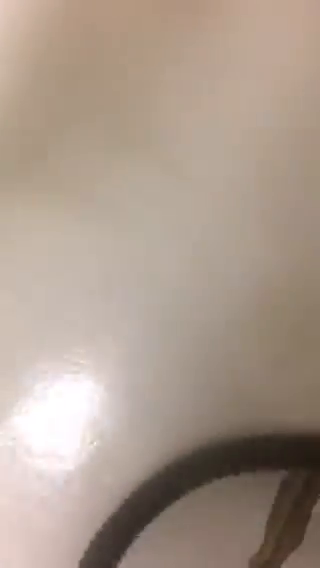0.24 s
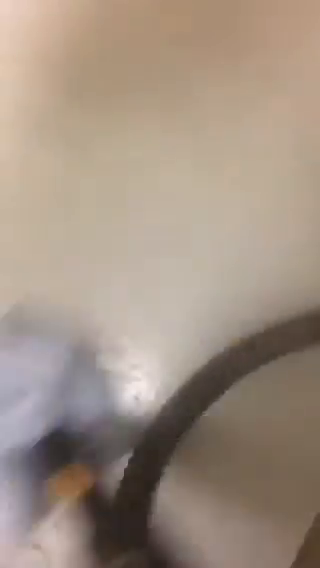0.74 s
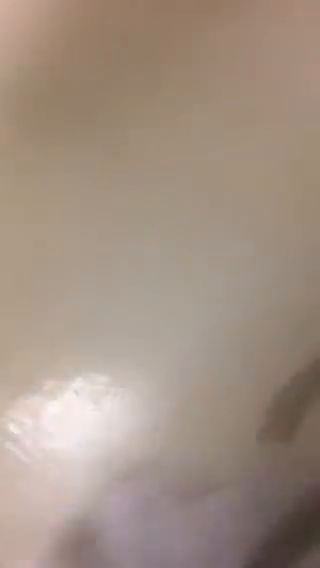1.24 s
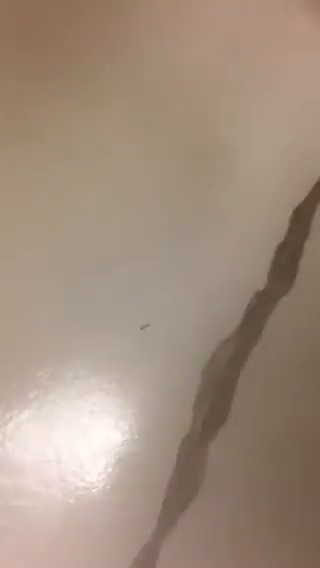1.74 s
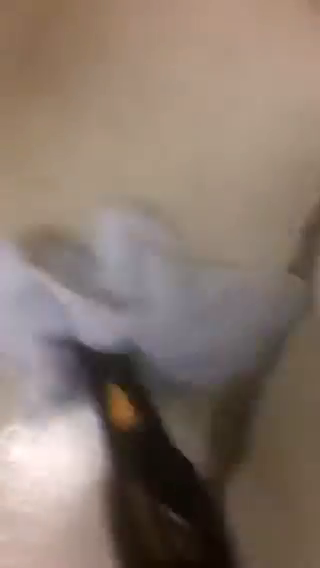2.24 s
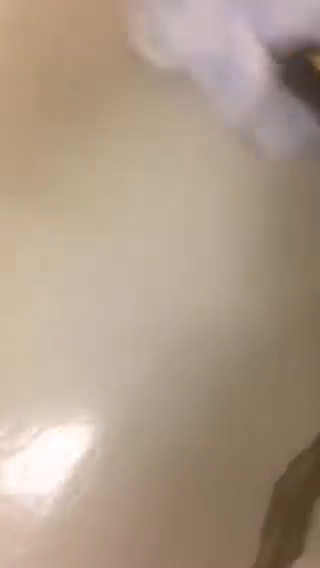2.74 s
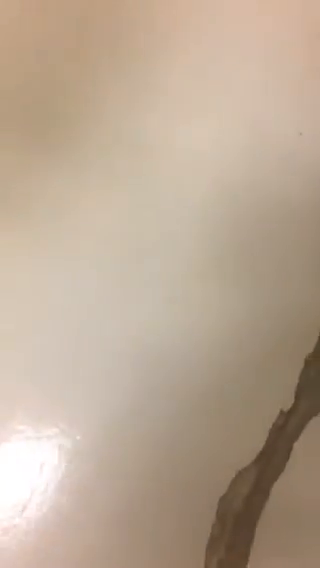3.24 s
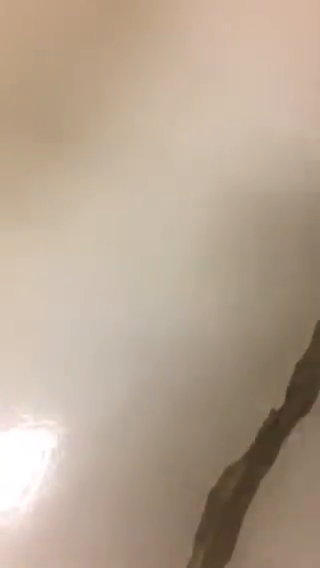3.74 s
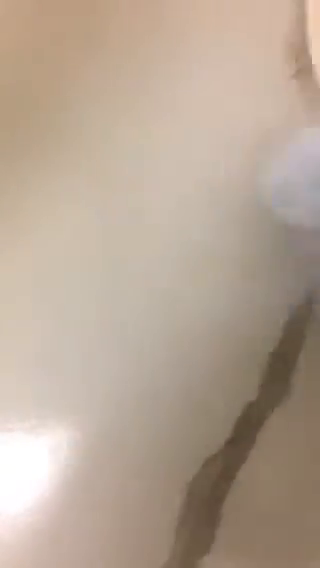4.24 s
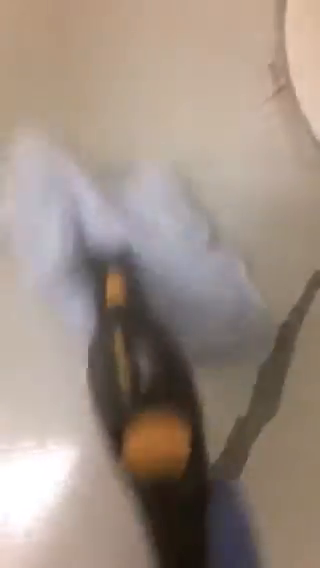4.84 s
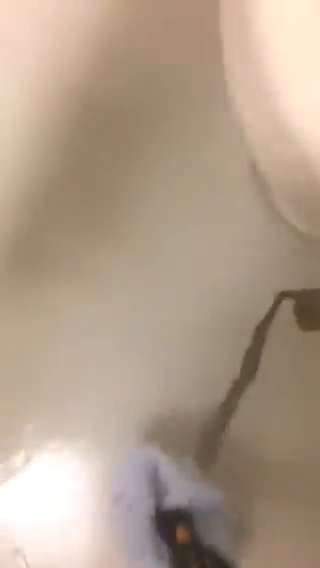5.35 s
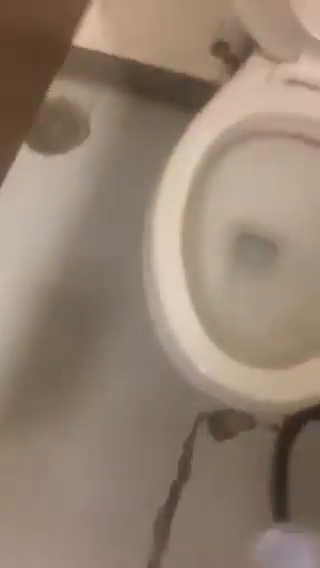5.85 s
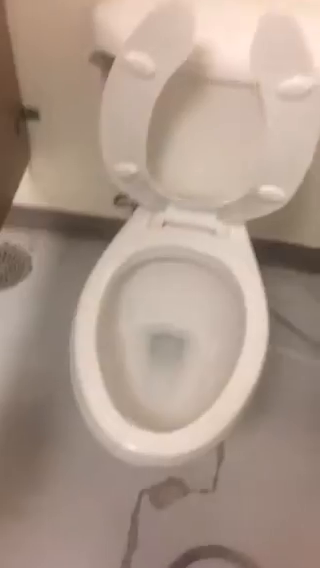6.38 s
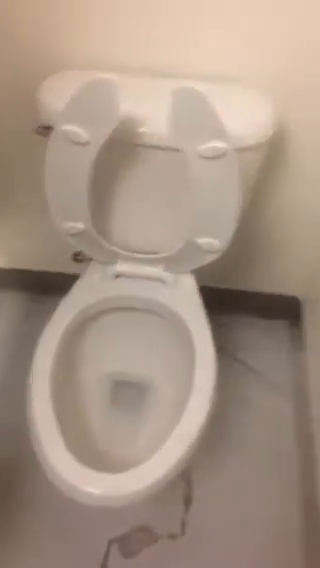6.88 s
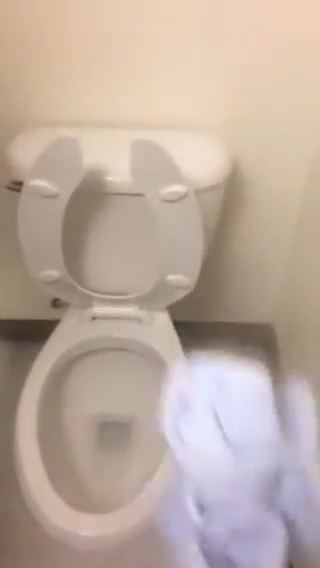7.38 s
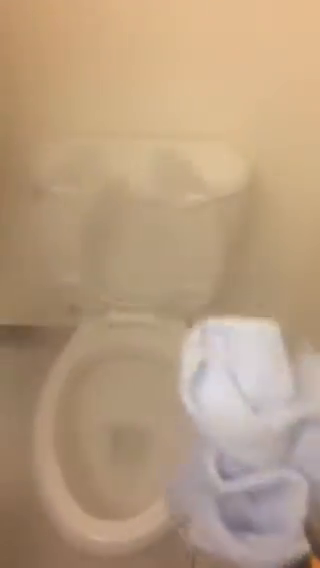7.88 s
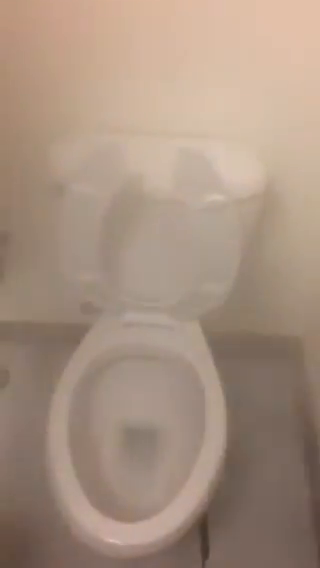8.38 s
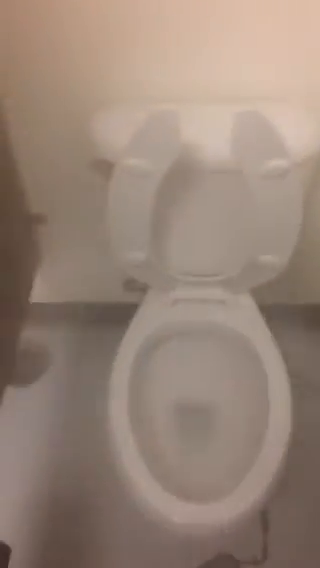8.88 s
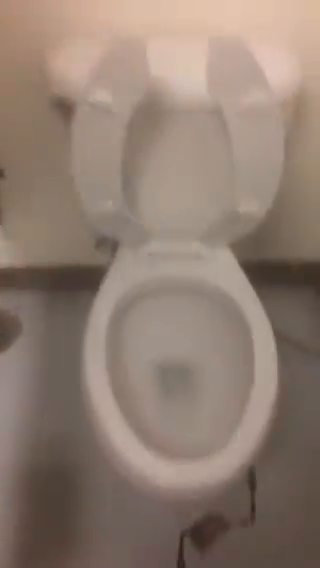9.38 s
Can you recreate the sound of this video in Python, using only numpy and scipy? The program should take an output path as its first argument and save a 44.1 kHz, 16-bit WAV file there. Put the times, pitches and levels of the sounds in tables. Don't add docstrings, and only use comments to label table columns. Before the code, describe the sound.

Rushing steam with a shifting, breathy tone fills a small echoing restroom until a sharp valve clack stops it, leaving quiet hum and tiny ticks.

```python
import sys
import numpy as np
from scipy import signal
from scipy.io import wavfile
from scipy.ndimage import uniform_filter1d, minimum_filter1d

SR = 44100
rng = np.random.default_rng(int(sys.argv[2]) if len(sys.argv) > 2 else 0)


def wrap_up_sound(samples):
    columns = np.atleast_2d(samples).T
    tamed = np.clip(columns, -1, 1)
    steps = np.round(tamed * 32767).astype(np.int16)
    wavfile.write(sys.argv[1], SR, steps)


def natural_amplitude(level_db):
    exponent = np.asarray(level_db, float) / 20
    return 10 ** exponent


N = 424241
STEP = 32
SHUT_S = 7.777
# pitch_hz, t60_s (time to fall 60 dB)
WALLS = [(60, 0.1), (300, 0.38), (800, 0.7), (4000, 0.84), (8000, 0.63), (14000, 0.19)]


def rms_one(x):
    return x / np.sqrt(np.mean(x ** 2) + 1e-20)


def at_hz(points, hz):
    pitch_hz, value = np.transpose(points)
    return np.interp(np.log(hz), np.log(pitch_hz), value)


def step_times():
    return np.arange(N // STEP + 2) * STEP / SR


def in_steps(rows):
    s, *columns = np.transpose(rows)
    return [np.interp(step_times(), s, column) for column in columns]


def smooth_up(slow):
    return np.interp(np.arange(N) / STEP, np.arange(len(slow)), slow)


def drift(rate_hz):
    r = np.exp(-2 * np.pi * rate_hz * STEP / SR)
    white = rng.standard_normal(N // STEP + 2002)
    return rms_one(signal.lfilter([1], [1, -2 * r, r * r], white)[2000:])


def swell(mid_s, length_s):
    place = np.clip((step_times() - mid_s) / max(length_s, .02), -1, 1)
    return place, np.cos(np.pi * place / 2) ** 2


def swells_db(events):
    return sum(rise_db * swell(mid_s, length_s)[1] for mid_s, length_s, rise_db in events)


def band_pass(x, low_hz, high_hz):
    return signal.sosfilt(signal.butter(2, [low_hz, high_hz], "band", fs=SR, output="sos"), x)


def bands(size, low=25, high=16000):
    limits_hz = high / 2 ** np.arange(0, np.log2(high / low), 1 / 4)
    white = rng.standard_normal((2, size))
    for k, (upper, lower) in enumerate(zip(limits_hz, limits_hz[1:])):
        yield np.sqrt(lower * upper), band_pass(white[k % 2], lower, upper)


def ring(x, hz, t60):
    r = natural_amplitude(-60 / (t60 * SR))
    w = 2 * np.pi * hz / SR
    return signal.lfilter([0, np.sin(w)], [1, -2 * r * np.cos(w), r * r], x + 1e-18)


def vent():
    # pitch_hz, level_db (per Hz)
    air_colour = [(15, -45), (25, -22.5), (69, -3), (123, -8.5), (168, 1), (366, -2.5), (427, -13),
                  (499, -1), (830, -8), (907, -2.5), (1010, -5), (2630, -25), (5000, -49), (6500, -67),
                  (11000, -120)]
    # pitch_hz, width_hz, level_db
    duct_rings = [(66, 12, -69.5), (227, 7, -66), (321.6, 10, -66), (408.3, 8.4, -58), (453.5, 9.3, -57.5),
                  (633, 25, -67)]
    # time_s, level_db
    hum_level = [
        (0.0, -60),
        (5.3, -63.5),
        (5.97, -55),
        (9.62, -51.5),
    ]
    air = 0
    for hz, noise in bands(N, low=90, high=4465):
        air = air + noise * natural_amplitude(at_hz(air_colour, hz)) * smooth_up(natural_amplitude(2.0 * drift(2.4)))
    white = rng.standard_normal(N)
    duct = 0
    for hz, width_hz, level_db in duct_rings:
        t60 = np.log(1000) / (np.pi * width_hz)
        duct = duct + natural_amplitude(level_db) * rms_one(ring(white, hz, t60))
    motor_hz = 120.4 + 1.24 * smooth_up(drift(4.2))
    hum = np.sqrt(2) * np.sin(2 * np.pi * np.cumsum(motor_hz) / SR)
    hum_db = in_steps(hum_level)[0] + 0.5 + 1.3 * drift(6.0)
    return natural_amplitude(-51.5) * rms_one(air) + duct + hum * smooth_up(natural_amplitude(hum_db))


def cloth_rustle():
    # pitch_hz, level_db (per Hz)
    cloth_colour = [(880, -30), (1500, 1), (2230, -8), (3550, -11.5), (13000, -23.5), (14500, -29),
                    (16000, -22)]
    # mid_s, length_s, rise_db
    moves = [
        (8.73, .3, 5.4),
        (9.24, .14, 4.6),
        (9.399, .04, 3),
    ]
    cloth = rms_one(sum(noise * natural_amplitude(at_hz(cloth_colour, hz)) for hz, noise in bands(N, low=1500)))
    return cloth * smooth_up(natural_amplitude(-67 + swells_db(moves)))


def hose_rumble():
    # mid_s, length_s, rise_db
    jolts = [
        (0.02, .3, 9),
        (.45, .2, 11),
        (1.58, .12, 4),
        (2.04, 0.08, 4),
        (2.82, 0.27, 3),
        (3.4, .3, 5),
        (3.8, .2, 10),
        (5.63, 0.12, 12),
        (7.81, 0.068, 26),
    ]
    rumble = rms_one(band_pass(rng.standard_normal(N), 40, 95))
    return rumble * smooth_up(natural_amplitude(-59.5 + swells_db(jolts) + 2.2 * drift(5.2)))


def cooling_ticks():
    # start_s, peak_db, pitch_hz
    ticks = [
        (8.6514, -54, 5580),
        (8.7194, -57, 6560),
        (8.7594, -50, 5550),
        (9.1847, -59, 6940),
        (9.2214, -42.5, 6370),
        (9.3985, -45, 6690),
        (9.5133, -50, 9620),
    ]
    out = np.zeros(N)
    for start_s, peak_db, hz in ticks:
        burst = rng.standard_normal(400) * natural_amplitude(-np.arange(400) * .3)
        at = round(start_s * SR)
        out[at:at + 400] += natural_amplitude(peak_db - 5.0) * ring(burst, hz, .0004)
    return out


def blow(events, body, low_hz, soft_hz, gain_db):
    (start_s, peak_db), = events
    push = band_pass(signal.unit_impulse(SR // 2), low_hz, soft_hz)
    ringing = 0
    for k, (hz, level_db, t60) in enumerate(body):
        ringing = ringing + (-1) ** k * natural_amplitude(level_db) * ring(push, hz, t60)
    out, at = np.zeros(N), round(start_s * SR)
    out[at:at + SR // 2] = ringing
    return natural_amplitude(peak_db + gain_db) * out


def hose_knocks():
    # start_s, peak_db
    tap = [
        (2.901, -30),
    ]
    knock = [
        (5.6185, -24),
    ]
    bounce = [
        (5.663, -37),
    ]
    # pitch_hz, level_db, t60_s
    tap_body = [(144, -1, 0.045), (188, -2, 0.075), (273, -5, 0.026), (614, -3, .02), (1300, -5, .015)]
    knock_body = [(107, -11.5, 0.087), (175, -7, 0.11), (232, -9.5, 0.098), (275.6, -6, 0.18),
                  (313, -8, 0.13), (373, -7, 0.12), (444, -13.5, .08), (546, -12, 0.14), (620, -7, 0.092),
                  (700, -9.5, .06)]
    out = blow(tap, tap_body, 70, 1400, 7.7)
    out += blow(knock, knock_body, 70, 1100, 7.6)
    return out + blow(bounce, knock_body, 70, 1100, 8.7)


def valve_clack():
    # start_s, peak_db
    snap = [
        (7.8088, -11),
    ]
    # pitch_hz, level_db, t60_s
    valve_body = [(640, -37, 0.027), (780, -0.5, 0.014), (1010, 0, 0.024), (1150, -4.5, 0.015),
                  (1490, -4.5, .008), (1835, -5, 0.013), (2300, -9.5, 0.0047), (11500, -0.5, .0015),
                  (13700, -0.5, .0015)]
    handle_body = [(170, -3.5, 0.039), (260, -6.5, 0.039), (424, -12, 0.029)]
    return blow(snap, valve_body, 450, 15000, 5.5) + blow(snap, handle_body, 60, 800, -13.0)


def walls(x, wet_db=-30.0, echo_s=.0098, echo_db=-5.0):
    t = np.arange(SR) / SR
    tail = sum(noise * natural_amplitude(-60 * t / at_hz(WALLS, hz)) for hz, noise in bands(SR))
    tail = natural_amplitude(wet_db) * tail * np.clip(t / 0.014, 0, 1)
    at = round(echo_s * SR)
    tail[at:at + 10] += natural_amplitude(echo_db) * np.hanning(10) / 4.5
    return x + signal.fftconvolve(x, tail)[:N]


def lift(t):
    lift_s, takes_s = 5.345, 0.15
    return np.clip((t - lift_s) / takes_s + .5, 0, 1)


def gaps(hz):
    # mid_s, length_s, level_db, from_hz, to_hz
    cloth_gaps = [(0.27, 0.47, 3, 12820, 5500), (0.557, 0.21, 7.5, 3610, 2010),
                  (0.89, 0.12, 4.5, 2720, 1970), (1.16, 0.14, 5.5, 3170, 3270),
                  (1.296, 0.1, 5.5, 2410, 2460), (1.54, 0.2, 7.0, 2780, 2900), (1.69, 0.22, 4.0, 630, 818),
                  (2.004, 0.56, 7, 14700, 9800), (2.283, 0.12, 4.5, 7620, 3840),
                  (2.41, 0.36, 7.5, 3080, 2760), (2.95, 0.29, 5, 870, 990), (3.15, 0.56, 2.5, 1540, 1720),
                  (3.668, 0.22, 7.5, 3570, 3360), (3.738, 0.16, 7, 7060, 15180), (3.82, 0.5, 4, 820, 430),
                  (4.094, 0.25, 4.5, 3400, 3580), (4.49, 0.32, 5.5, 17990, 10980),
                  (4.75, 0.28, 6.5, 3330, 2520), (4.81, 0.14, 4.5, 7830, 7130),
                  (5.179, 0.28, 6, 3000, 2730), (6.06, 0.13, 4.5, 12180, 12710),
                  (6.41, 0.12, 2, 4850, 4630), (7.64, 0.2, 7, 860, 753)]
    cloth_folds = [(0.14, 0.51, -5.5, 3570, 4990), (0.84, 0.42, -7.5, 770, 620),
                   (0.76, 0.17, -4.5, 4320, 4590), (1.026, 0.27, -5.5, 8320, 4660),
                   (1.85, 0.27, -2.0, 2670, 2353), (3.14, 0.48, -4.5, 2850, 5080),
                   (3.84, 0.22, -7, 6220, 3440), (4.41, 0.4, -4.0, 4310, 3460),
                   (5.04, 0.21, -8.5, 5020, 4360), (5.48, 0.13, -7.5, 1760, 940),
                   (6.48, 0.56, -4.5, 1300, 1917), (6.84, 0.75, -4.5, 840, 802)]
    out = 0
    for mid_s, length_s, level_db, from_hz, to_hz in cloth_gaps + cloth_folds:
        place, shape = swell(mid_s, length_s)
        off_octaves = np.log2(hz / np.sqrt(from_hz * to_hz)) - place * np.log2(to_hz / from_hz)
        out = out + level_db * shape * np.exp(-.5 * (off_octaves / .28) ** 2)
    return out


def floor_echo(x):
    # mid_s, length_s, rise_db
    by_bowl = (4.5, 1.1, 8)
    now = np.arange(N)
    late = np.interp(now - .00189 * SR, now, x)
    middle = signal.butter(2, [950, 2400], "band", fs=SR, output="sos")
    echo = signal.sosfiltfilt(middle, late)
    return x - (1 - lift(now / SR)) * natural_amplitude(-15 + smooth_up(swells_db([by_bowl]))) * echo


def reflections(x, wander_s=0.000401):
    # delay_s, level_db
    near_tiles = [(.0015, -22.5), (.0021, -16), (.0028, -14), (.0043, -13.5), (.0089, -13), (0.0142, -15),
                  (0.019, -17), (0.0272, -11.5), (0.0375, -21)]
    now = np.arange(N)
    out = x
    for delay_s, level_db in near_tiles:
        path = (delay_s + wander_s * smooth_up(drift(0.511))) * SR
        out = out + natural_amplitude(level_db) * np.interp(now - path, now, x)
    return out


def steam(patchy_db=0.9, flutter_db=1.57, muffling=3.4, direct_share=0.52):
    jet_regions_hz = [1300, 3100, 6000, 11000]
    # pitch_hz, level_db (per Hz)
    jet_colour = [(88, -43), (150, -44.5), (182, -23.5), (222, -22), (281, -14), (342, -20.5), (477, -8),
                  (1130, -1), (1370, 3.5), (2380, 3), (6580, -3), (8490, -9.5), (10300, -7.5),
                  (13600, -18.5), (16200, -20.5)]
    # (cloth opening, as treble over near_db)
    nozzle = [(0.0, -24.5, -13.5), (0.12, -24, -9), (0.56, -22, -13.5), (0.72, -25, -8), (0.91, -23, -13.5),
              (1.47, -25.5, -12.5), (2.08, -23.5, -9), (2.44, -25.0, -17.5), (2.82, -24.5, -9.5),
              (3.05, -22.5, -21.5), (3.54, -26.0, -8.5), (3.62, -25.5, -10.5), (3.77, -22.5, -10.5),
              (3.91, -23.0, -16), (5.09, -23.5, -17), (5.77, -24.5, -7), (6.01, -23.0, -7.0),
              (7.78, -24.0, -6)]
    near_share = [1.1, 0.66, 1, 0.77]
    open_share = [-0.14, 0.056, .29, 0.57]
    lift_db = [-5, 0.1, -0.1, -.9]
    near_db, open_db = in_steps(nozzle)
    t = step_times()
    since_shut, lifted = np.maximum(t - SHUT_S, 0), lift(t)
    pocket_hz = (2500 + (3180 - 2500) * lifted) * np.exp(.04 * drift(3.7))
    swings = np.outer(near_share, near_db) + np.outer(open_share, open_db) + np.outer(lift_db, lifted)
    swings -= swings[:, since_shut == 0].mean(axis=1, keepdims=True)
    out = 0
    for hz, noise in bands(N, low=139.5):
        share = [np.interp(np.log(hz), np.log(jet_regions_hz), row) for row in np.eye(4)]
        share[0] *= min(hz / 900, 1) ** 0.16
        share[3] *= 1 + muffling * max(np.log2(hz / 9500), 0)
        pocket_db = 4 * np.exp(-.5 * (np.log2(hz / pocket_hz) / .25) ** 2)
        pocket_db -= pocket_db.mean()
        flicker_db = (patchy_db * drift(7.2) + flutter_db * drift(25)) * np.exp(-since_shut / .05)
        direct = direct_share * np.exp(-since_shut / 0.058)
        in_walls = (1 - direct_share) * natural_amplitude(-120 * since_shut / at_hz(WALLS, hz))   # power, so 120 for 60 dB
        level_db = at_hz(jet_colour, hz) + share @ swings + pocket_db + gaps(hz) + flicker_db
        out = out + noise * smooth_up(natural_amplitude(level_db) * np.sqrt(direct + in_walls))
    out = reflections(floor_echo(out))
    return natural_amplitude(-24) * out / np.sqrt(np.mean(out[:round(SHUT_S * SR)] ** 2))


def scene():
    background = vent() + cloth_rustle() + hose_rumble() + cooling_ticks()
    blows = walls(hose_knocks() + valve_clack())
    return np.tile(background + blows + steam(), (2, 1))


def band_limit(x):
    return signal.sosfilt(signal.butter(12, 15850, fs=SR, output="sos"), x)


def record(dry, hold_s=0.32, limit_db=-18.0):
    dry = signal.sosfilt(signal.butter(2, 38, "high", fs=SR, output="sos"), dry)
    loudness_db = 10 * np.log10(uniform_filter1d(dry[0] ** 2, size=512) + 1e-12)
    over_db = np.maximum(loudness_db - limit_db, 0)
    hold = round(hold_s * SR)
    held_db = minimum_filter1d(-.9 * over_db, hold, origin=(hold - 1) // 2)
    r = np.exp(-1 / (0.03 * SR))
    duck_db = signal.lfilter([1 - r], [1, -r], held_db)
    return band_limit(dry * natural_amplitude(duck_db))


dry = scene()
out = record(dry)
wrap_up_sound(out)
```